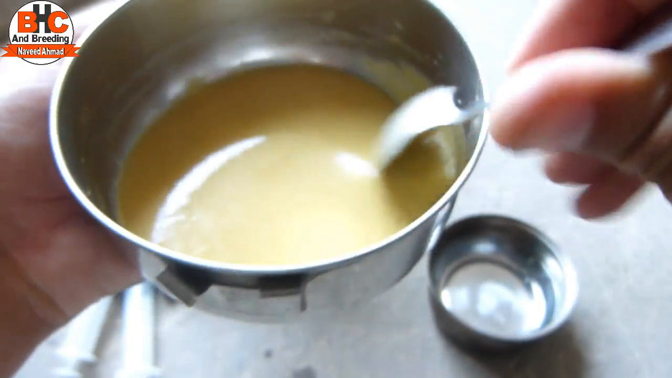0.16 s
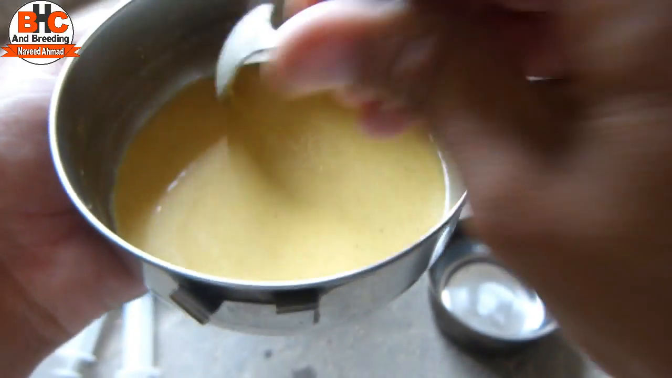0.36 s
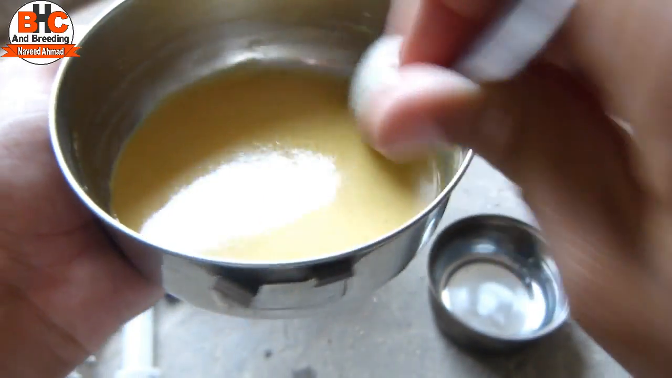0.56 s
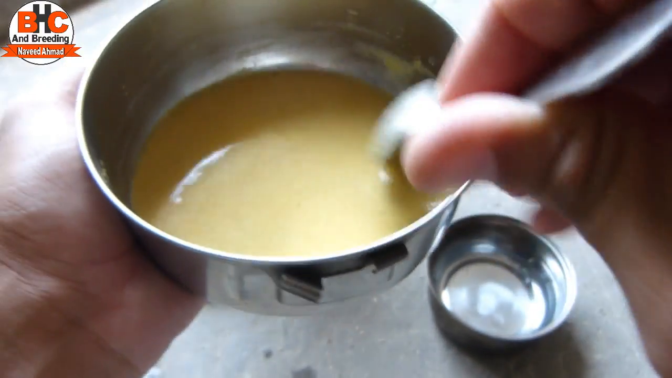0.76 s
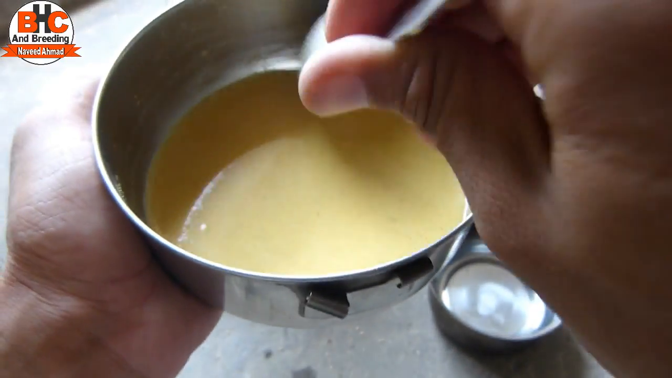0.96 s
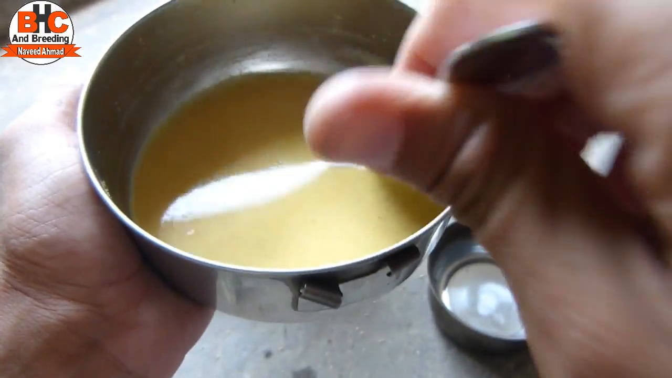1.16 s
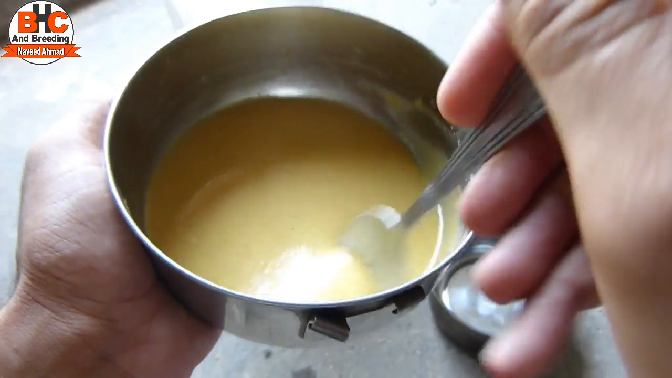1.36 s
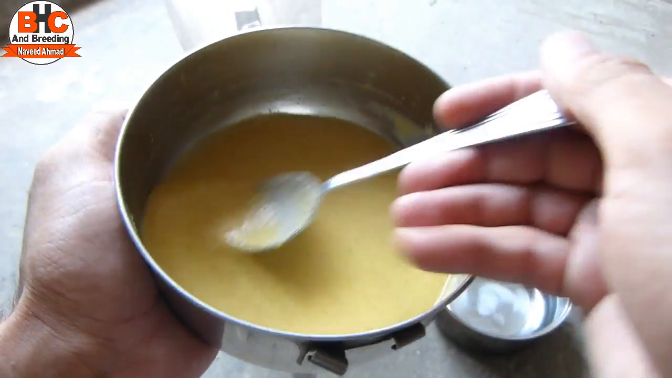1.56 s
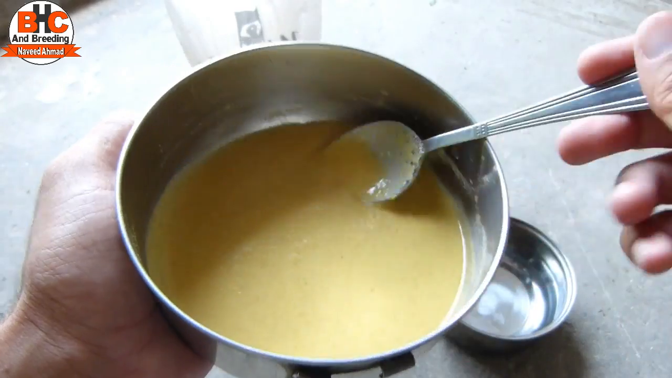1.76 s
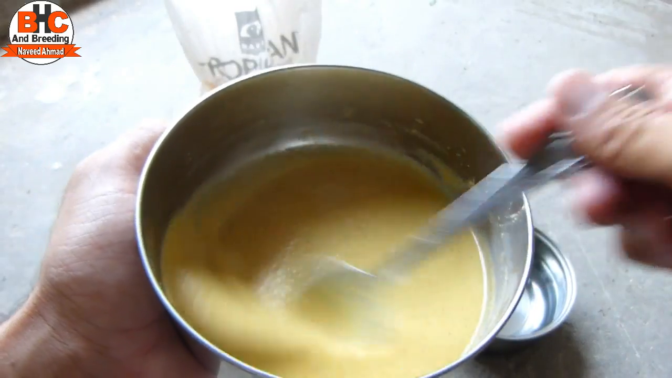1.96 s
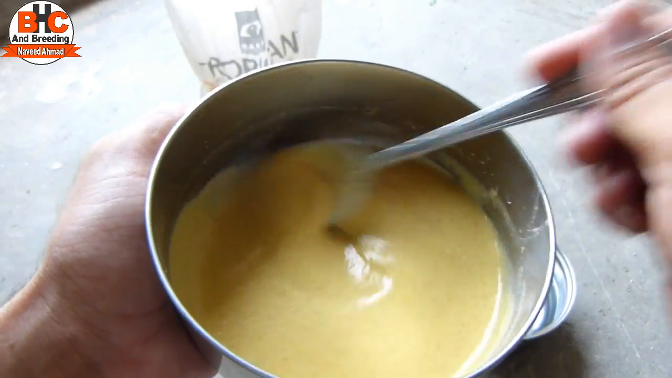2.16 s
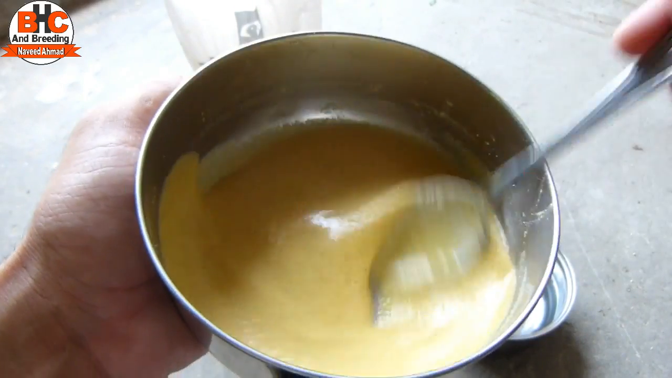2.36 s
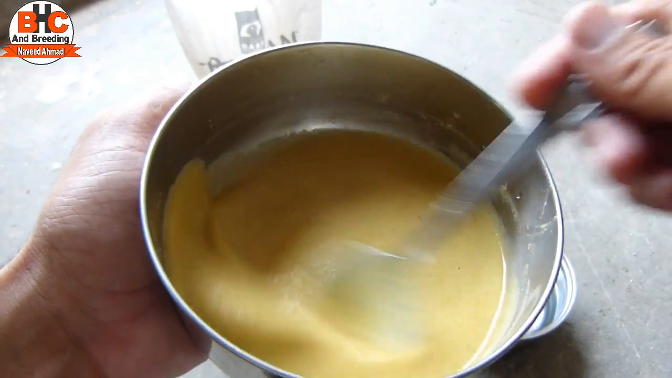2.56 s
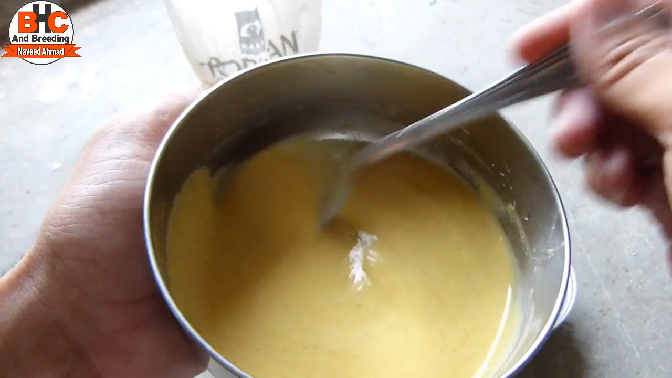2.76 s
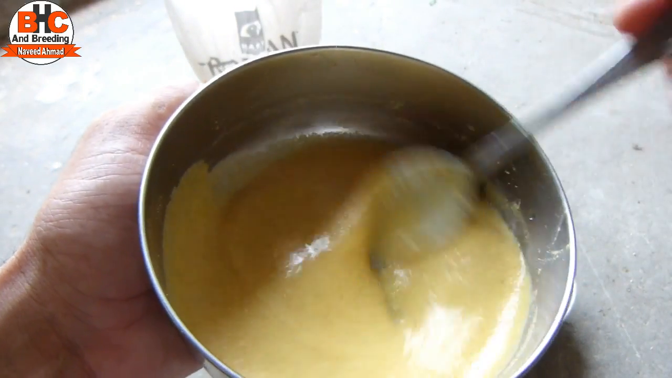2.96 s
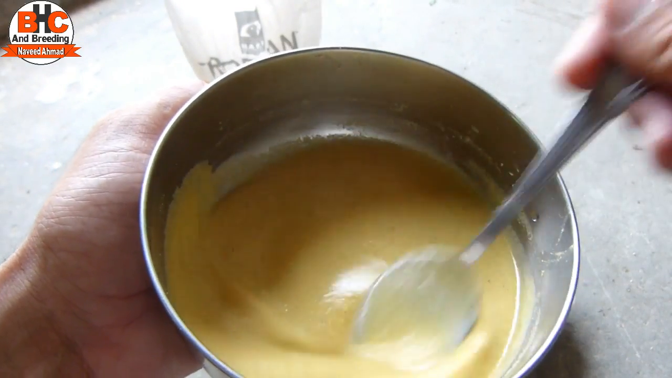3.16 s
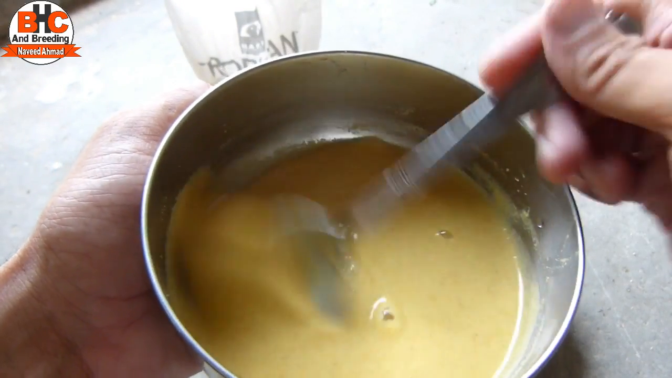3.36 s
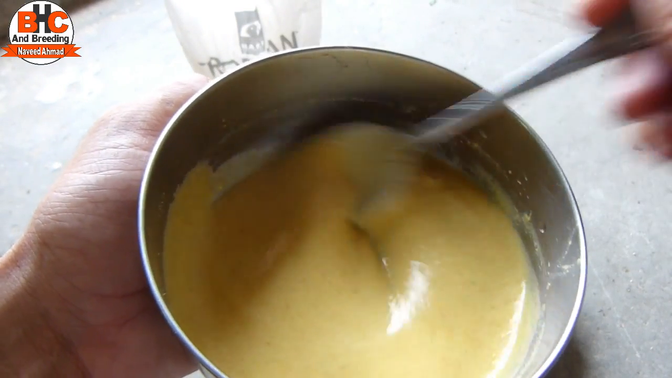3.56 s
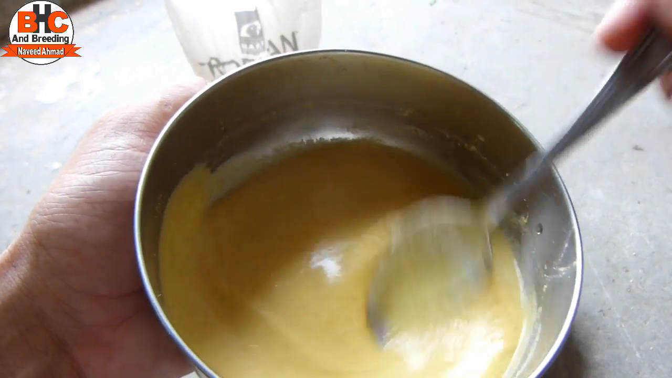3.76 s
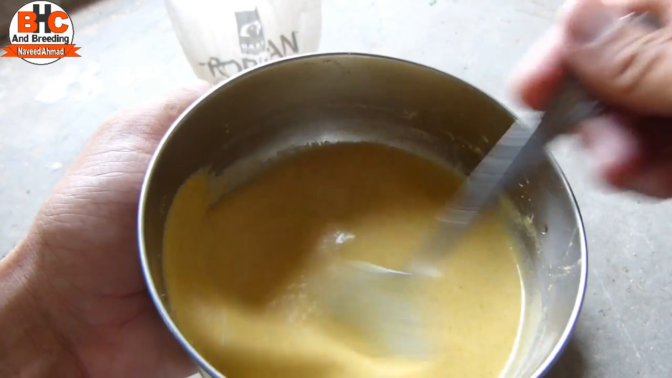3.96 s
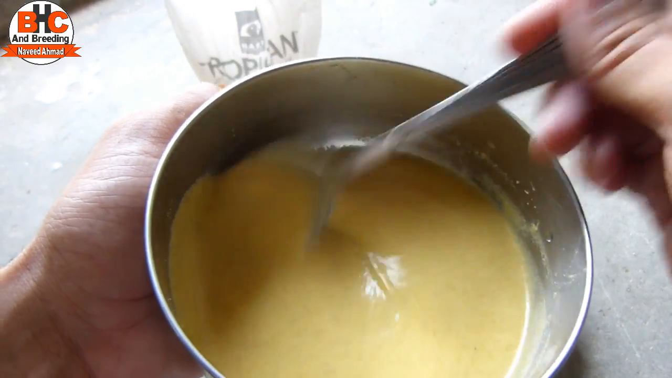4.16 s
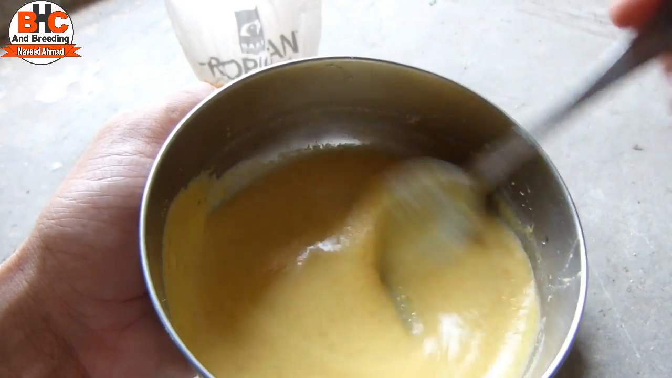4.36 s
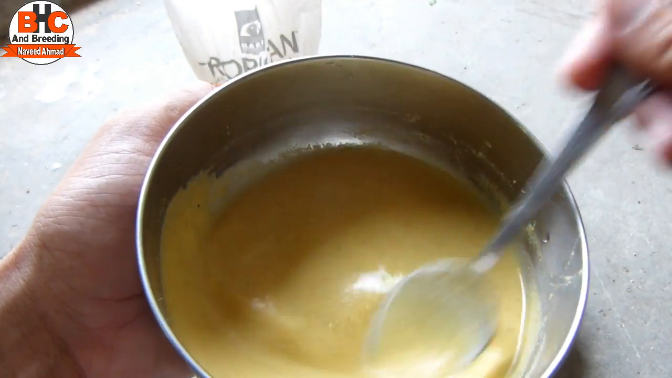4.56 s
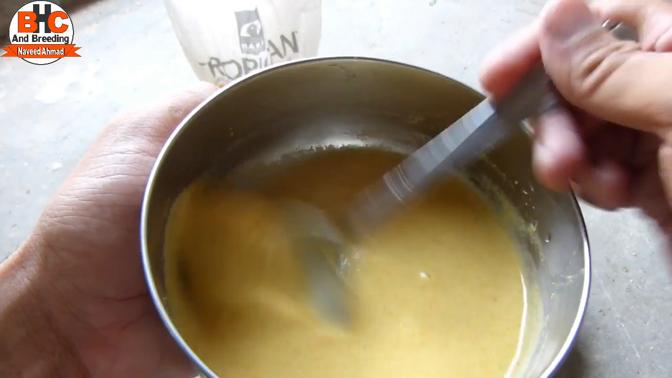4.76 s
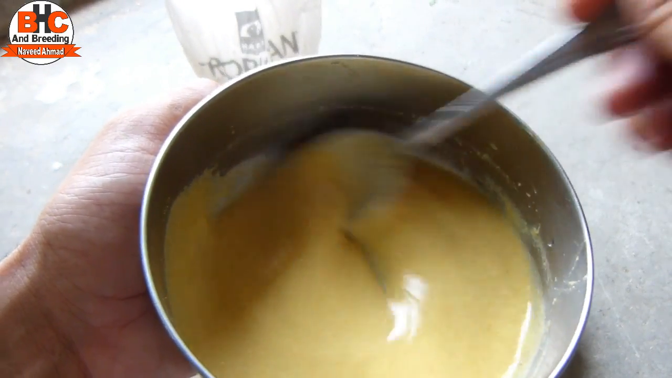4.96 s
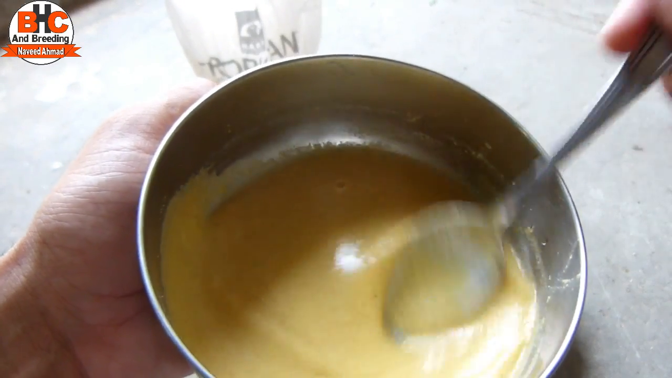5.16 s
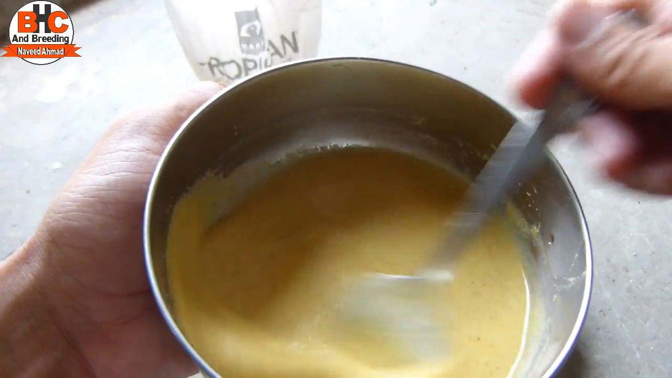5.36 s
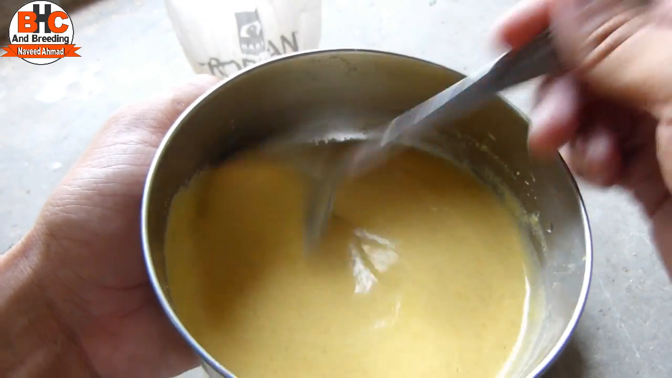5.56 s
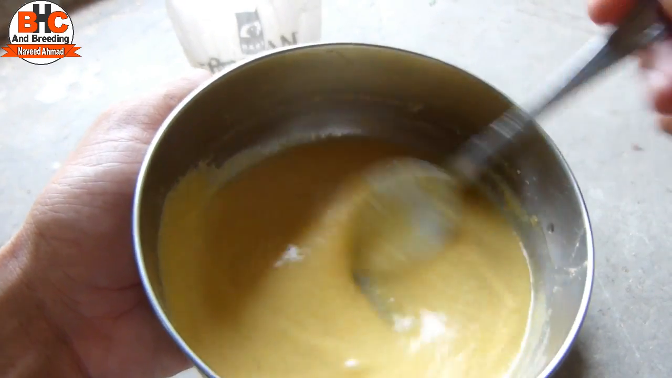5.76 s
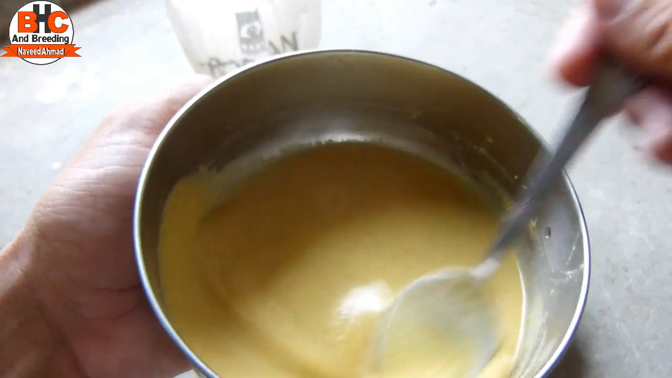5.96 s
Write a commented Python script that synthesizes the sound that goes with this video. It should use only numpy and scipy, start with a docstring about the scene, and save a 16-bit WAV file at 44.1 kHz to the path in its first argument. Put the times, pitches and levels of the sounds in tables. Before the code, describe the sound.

Very close in a small hard indoor room, a spoon edge rasps against a steel bowl. Thin, hesitant scrapes and isolated clanks come first, then louder quick strokes in a steady stirring rhythm, peppered with short metallic knocks. Thick batter and the gripping hand damp the metal, so each ring dies quickly. Low sloshing follows the strokes, a few bubbles pop late, and faint house noise stays underneath.

```python
"""A steel spoon scrapes round a hand-held steel bowl of thick batter, close to a small stereo microphone.
Its edge rasps over the wall in dense random catches that ring the bowl's modes; now and then it knocks,
a noise crack plus decaying modes. Hand and batter damp the bowl, so it rings only briefly.
Shaped noise makes the sloshing batter, the sliding hand and the faint house; gliding tones are bursting
air pockets. A small hard room answers with a decaying noise tail."""
import sys
import numpy as np
from scipy import signal
from scipy.fft import rfft, irfft, next_fast_len
from scipy.io import wavfile
from scipy.ndimage import uniform_filter1d

SR = 44100
rng = np.random.default_rng(int(sys.argv[2]) if len(sys.argv) > 2 else 0)


def persist_wave(psi):
    """Save psi, clipped to +-1, as 16-bit WAV."""
    counts = np.round(np.clip(psi, -1, 1) * 32767).astype(np.int16)
    wavfile.write(sys.argv[1], SR, np.atleast_2d(counts).T)


def boost(x):
    """Linear amplitude factor 10**(x/20) for a level x in decibels (scalar or array-like)."""
    u = np.asarray(x, float) / 20
    return 10 ** u


N = 265526

# knocks of the spoon: (time [s], level [dB], lower modes and thud, relative [dB], favoured lower pitch [Hz])
KNOCKS = [(0.1122, -13, 2.5, 1930), (0.4261, -5.5, 1.5, 1196), (0.9555, 2.5, -13, 1770),
          (1.153, -12, -30, 1500), (1.744, 1, -19.5, 705), (1.8026, -2, -6.5, 660), (2.0425, 0, -17.5, 825),
          (2.1129, -4, -12, 931), (2.2697, -6, -9, 1650), (2.283, -11.5, -4, 1020), (2.387, -15, -18, 1480),
          (2.409, -9, -29, 880), (2.5654, -2, -14, 1620), (2.697, -5, -20, 1650), (2.9393, -1.5, -16, 920),
          (2.9738, 0.5, -11, 930), (3.1202, -2.5, -8.5, 880), (3.3945, -3.5, -7, 1020),
          (3.5117, -2, -8.5, 930), (3.5406, -4, -10, 940), (3.6075, -2.5, -8, 950), (3.6772, -8.5, -6, 980),
          (3.886, -2, -26, 1540), (3.9555, -17, 4.5, 1590), (4.0891, -9.5, -14.5, 850),
          (4.1015, -4, -20, 950), (4.166, -6, -4, 1620), (4.2222, -7.5, -9, 950), (4.2379, -16, -4, 966),
          (4.37, -3.5, -18, 920), (4.4623, -6, -19, 964), (4.5179, -6.5, -7, 1000), (4.632, -6, -2.5, 900),
          (4.6632, -5, -6, 890), (4.782, -14, 4.5, 1690), (4.795, -0.5, -15, 964), (4.9331, 2.5, -17, 900),
          (5.1763, 0.5, -11, 910), (5.2148, -1.5, -6, 907), (5.3521, -11, 1, 1630), (5.4953, -4, -10, 940),
          (5.6167, -6.5, -3, 1490), (5.6311, -5, -3.5, 1680), (5.742, -20, -29, 900),
          (5.7761, -4.5, -19, 883), (5.825, -21.5, 8, 710)]
# deep modes of the bowl: (frequency [Hz], relative level [dB])
DEEP_MODES = [(710, 19), (840, -4), (920, 23), (990, 21.5)]
# middle modes of the bowl: (frequency [Hz], relative level [dB])
MIDDLE_MODES = [(1420, -23), (1560, 26.5), (1640, 29), (1850, 15.5), (2105, 29), (2260, 27), (2480, 20),
                (2700, 26), (3000, 33), (3240, 36)]
# bright modes of the bowl: (frequency [Hz], relative level [dB])
BRIGHT_MODES = [(3720, 0), (4050, 23), (4200, 17.5), (4700, -18), (5050, 19.5), (5420, -23), (5580, 18.5),
                (7150, -32), (7750, 1), (8200, 23), (8600, -23), (9400, -20), (11000, 32)]

LEFT_RIGHT = np.array([[1], [-1]])  # sign of the side signal in each ear


def unit(x):
    """Scale to rms 1."""
    return x / np.sqrt(np.mean(x ** 2))


def colour(x, table):
    """Filter by (frequency [Hz], gain [dB]) points, interpolated over log frequency."""
    n = next_fast_len(x.shape[-1])
    hz, db = np.transpose(table)
    bin_hz = np.arange(n // 2 + 1) * SR / n
    gain = boost(np.interp(np.log(bin_hz + 1), np.log(hz), db))
    return irfft(rfft(x, n) * gain, n)[..., :x.shape[-1]]


def walk(rate_hz):
    """Random levels held 1 / rate_hz s and smoothed twice; spread near 1."""
    k = max(int(SR / rate_hz), 2)
    held = np.repeat(rng.standard_normal(N // k + 1), k)
    return 1.4 * uniform_filter1d(uniform_filter1d(held, k), k)[:N]


def curves(table):
    """Columns of a (time [s], value, ..) table at every sample."""
    s, *columns = np.transpose(table)
    return [np.interp(np.arange(N) / SR, s, c) for c in columns]


def tail(t60_s, seconds, wide):
    """Decaying noise for both ears, scaled to unit energy; wide weighs the part that differs between them."""
    t = np.arange(int(seconds * SR)) / SR
    mid, side = rng.standard_normal((2, len(t)))
    both = np.exp(-np.log(1000) * t / t60_s) * (mid + wide * side * LEFT_RIGHT)
    return both / np.sqrt(np.sum(both ** 2) / 2)


def decay_step(hz, t60_s):
    """Complex factor that advances a decaying tone by one sample."""
    return np.exp(2j * np.pi * hz / SR - np.log(1000) / (t60_s * SR))


def pole(hz, damp=1):
    """One sample step of a bowl mode; the higher, the shorter it rings."""
    t60_1khz_s, slope = 0.095, 0.6
    return decay_step(hz, damp * t60_1khz_s * (1000 / hz) ** slope)


def ears(hz):
    """A mode reaches left and right a little out of step, at random, the more the higher it lies."""
    spread_3khz_rad = 0.35
    shift_rad = spread_3khz_rad * np.sqrt(hz / 3000) * rng.standard_normal()
    return np.exp(1j * shift_rad * LEFT_RIGHT)


def nearness(hz, centre_hz, reach):
    """Gain of a mode by how near it lies to the pitch that the contact favours; reach in log frequency."""
    return boost(-10 * np.minimum((np.log(hz / centre_hz) / reach) ** 2, 2))


def strokes(step=44):
    """Level [dB], age [s], deep level [dB], bright pitch [Hz] of the strokes; power weighs those that overlap."""
    bite_db_s, swell_db_s, lift_db_s = 522, 16.5, 305  # slopes before, during and after a stroke
    # spoon along the wall:
    # (start [s], length [s], mid-stroke level [dB], deep modes relative [dB], bright pitch [Hz])
    stroke_table = [(0, 0.031, -30, -38.5, 6100), (0.07, 0.0058, -37, -11.5, 5800),
                    (0.107, 0.09, -42.5, -0.5, 5500), (0.219, 0.24, -33.5, -16.5, 4860),
                    (0.439, 0.066, -34.5, -15, 5960), (0.609, 0.079, -30.5, -27, 7340),
                    (0.825, 0.12, -42, -30, 3670), (0.96, 0.2, -31, -23.5, 8160),
                    (1.209, 0.065, -28.5, -13, 6600), (1.37, 0.12, -25, -20, 6100),
                    (1.816, 0.13, -26, -20.5, 6370), (2.087, 0.042, -25, -13.5, 5640),
                    (2.189, 0.07, -21, -12.5, 5830), (2.416, 0.012, -23.5, -13.5, 6800),
                    (2.48, 0.053, -20.5, -13, 6570), (2.602, 0.1, -21.5, -20.5, 6570),
                    (2.768, 0.11, -21, -31.5, 6440), (2.89, 0.097, -23, -15, 6940),
                    (3.051, 0.062, -20.5, -14.5, 6400), (3.161, 0.1, -19, -16.5, 7400),
                    (3.329, 0.037, -17, -18.5, 4900), (3.399, 0.063, -25.5, -17, 7100),
                    (3.542, 0.016, -22.5, -9.5, 5400), (3.617, 0.085, -20, -14.5, 5030),
                    (3.792, 0.045, -17, -22, 6500), (3.892, 0.054, -20, -13, 5400),
                    (3.987, 0.085, -21.5, -27.5, 6570), (4.095, 0.002, -19, -8.5, 6400),
                    (4.158, 0.081, -18.5, -19, 5070), (4.381, 0.0027, -19.5, -12.5, 6700),
                    (4.44, 0.086, -19, -20, 5100), (4.634, 0.087, -24.5, -11, 5740),
                    (4.764, 0.065, -20.5, -22, 5160), (4.879, 0.056, -22.5, -22, 6570),
                    (4.996, 0.083, -19.5, -15, 5940), (5.177, 0.069, -26.5, -10.5, 6500),
                    (5.289, 0.045, -17, -11, 5900), (5.379, 0.12, -20, -25.5, 6820),
                    (5.551, 0.081, -17, -17, 5400), (5.668, 0.024, -31, -21, 5640),
                    (5.784, 0.14, -19, -12, 5570)]
    t = np.arange(0, N + step, step) / SR
    start, seconds, db, deep_db, hz = np.transpose(stroke_table)[:, :, None]
    end = start + seconds
    age_s = np.clip(t, start, end) - start
    db = db + swell_db_s * (age_s - seconds / 2)
    db = db - bite_db_s * np.maximum(start - t, 0) - lift_db_s * np.maximum(t - end, 0)
    power = boost(db) ** 2
    total = power.sum(axis=0)
    means = [(power * column).sum(axis=0) / total for column in (age_s, deep_db, hz)]
    return curves(np.transpose([t, 10 * np.log10(total), *means]))


def catches(share=0.25, scatter_db=3.0, bounce_db=5.0, judder_db=2.0):
    """The edge catches and slips at random, in a share of all samples; small bounces bring sudden flurries."""
    bounce_rate_hz, bounce_decay_s = 60, 0.004
    chance = rng.random((5, N))
    sizes = boost(-scatter_db * np.log(chance[1] + 1e-4)) * np.sign(chance[2] - 0.5)
    bounces = (chance[3] < bounce_rate_hz / SR) * boost(bounce_db) * chance[4] ** 2
    flurry = 1 + signal.lfilter([1], [1, -np.exp(-1 / (bounce_decay_s * SR))], bounces)
    judder = boost(judder_db * walk(90))
    return unit((chance[0] < share) * sizes * flurry * judder)


def rubbed(modes, force, centre_hz, reach, bend=0, roam_db=4.0, drift=0.022):
    """The moving contact feeds each mode now more, now less; sloshing batter detunes it (share of pitch)."""
    out, power = 0, 0
    for hz, db in modes:
        mode_hz = hz * (1 + bend + drift * walk(10))
        turn = np.exp(2j * np.pi * np.cumsum(mode_hz) / SR)
        fade = abs(pole(hz))
        gain = boost(db + roam_db * walk(30)) * nearness(hz, centre_hz, reach)
        # a one-pole decay in the mode's own turning frame is a resonator of moving pitch
        ring = turn * signal.lfilter([1], [1, -fade], force * gain / turn)
        out = out + np.sqrt(1 - fade ** 2) * (ring * ears(hz)).imag
        power = power + gain ** 2 / 2
    return out / np.sqrt(uniform_filter1d(power, size=2000))  # the modes share one supply of energy


def crowd(force):
    """Wall modes too close to tell apart: patches of differing tint, fed more or less as the spoon travels."""
    t60_s, patch_count, roam_db, hump_db = 0.02, 9, 5.0, 9
    # colour common to all patches: (frequency [Hz], gain [dB])
    crowd_table = [(1500, -77), (2300, -5.5), (3500, -19), (4050, -6), (6000, -5), (7900, -2),
                   (11400, -8.5), (14500, -23.5), (16500, -128)]
    out, power = 0, 0
    for hz in np.geomspace(3300, 12500, patch_count):
        patch = colour(tail(t60_s, 0.06, wide=0.19 * np.sqrt(hz / 6000)), crowd_table)
        patch = patch / np.sqrt(np.sum(patch ** 2) / 2)
        patch = colour(patch, [(hz / 1.154, 0), (hz, hump_db), (hz * 1.17, 0)])
        share = boost(roam_db * walk(25))
        out = out + signal.oaconvolve(force[None] * share, patch, axes=1)[:, :N]
        power = power + share ** 2
    return out / np.sqrt(power)


def rasp():
    """Spoon edge dragged along the wall: catches drive bright modes and crowd, rarer jolts the lower modes."""
    # at first the spoon works the dry wall above the batter:
    # (time [s], lift of the middle modes [dB], their favoured pitch [Hz])
    dry_wall = [(0, 31, 1850), (.15, 4, 1920), (.3, 0.5, 2200), (.5, -3.5, 2000), (.61, 24, 2320),
                (.66, 24.5, 2060), (.72, 5.5, 2360), (.95, 18, 2560), (1.05, 12.5, 2100), (1.3, -2.5, 2000),
                (6.02, -0.5, 2000)]
    press_db, age_s, deep_db, bright_hz = strokes()
    dry_db, middle_hz = curves(dry_wall)
    force = catches() * boost(press_db)
    jolts = catches(share=0.004, scatter_db=1.5, bounce_db=0.0, judder_db=3.0) * boost(press_db)

    wall = crowd(force)
    top = signal.sosfilt(signal.butter(2, 6800, "high", fs=SR, output="sos"), wall)
    wall = wall + top * (bright_hz / 6000 - 1)  # a high contact pitch brightens the crowd too
    bright = boost(-5.0) * rubbed(BRIGHT_MODES, force, bright_hz, reach=0.4) + boost(-4.5) * wall

    # middle level follows the deep level in part and drops 7.5 dB per octave of bright pitch
    middle_db = -5 + 0.58 * deep_db - 7.5 * np.log2(bright_hz / 6000) + dry_db
    middle_reach = np.clip(0.45 - 0.013 * dry_db, 0.15, 1)
    middle = rubbed(MIDDLE_MODES, (force + jolts) * boost(middle_db), middle_hz, middle_reach)

    push = (0.18 * force + jolts) * boost(deep_db)
    bend = 0.04 - 0.9 * age_s  # deep pitch falls through each stroke
    deep = rubbed(DEEP_MODES, push, 940, reach=0.3, bend=bend, roam_db=4.5, drift=0.015)
    return bright + middle + deep


def batter():
    """Dull sloshing: low noise that swells with the stroke."""
    slosh_db, follow, wide = -44, 0.5, 0.76
    table = [(40, -14), (110, -5), (220, 0.0), (450, 1.5), (800, -41)]
    mid, side = colour(rng.standard_normal((2, N)), table)
    swell_db = follow * strokes()[0] + 3 * walk(30)
    return boost(slosh_db + swell_db) * (mid + wide * side * LEFT_RIGHT) / np.std(mid)


def house():
    """Faint steady hum and hiss of shaped noise, partly different left and right."""
    level_db, wide = -54.5, 0.68
    # colour of the house noise: (frequency [Hz], gain [dB])
    house_table = [(20, 24), (60, 8.5), (160, 20), (300, 14.5), (500, 17.5), (900, 16), (2200, 14),
                   (3200, 0), (5000, 6), (9000, -2), (16000, -29)]
    mid, side = colour(rng.standard_normal((2, N)), house_table)
    return boost(level_db) * (mid + wide * side * LEFT_RIGHT) / np.std(mid)


def room(bowl):
    """A small hard room answers the bowl with a decaying noise tail."""
    level_db, t60_s = -17.5, 0.31
    walls = colour(tail(t60_s, 0.5, wide=0.89), [(200, 13.5), (16000, 5)])
    echo = signal.fftconvolve(bowl.mean(axis=0)[None], walls, axes=1)[:, :N]
    return boost(level_db) * echo


def grip():
    """The holding hand slides on the outside of the bowl, skin on steel: a soft low rub."""
    # the slide: (start [s], length [s], level [dB])
    slide = (0.03, 0.56, -47)
    start_s, length_s, level_db = slide
    progress = np.clip((np.arange(N) / SR - start_s) / length_s, 0, 1)
    shape = np.sin(np.pi * progress) ** 0.5
    table = [(150, -20.5), (300, -14), (460, -2.5), (650, -10), (1100, -31)]
    return boost(level_db) * shape * unit(colour(rng.standard_normal(N), table))


def struck(modes, steps, centre_hz, reach, sag_per_s=0):
    """One blow: modes start at random strengths, those near the blow's pitch favoured; peak 1."""
    damp = 0.83  # the spoon on the wall shortens the ring to this share
    hz, db = np.transpose(modes)
    gain = boost(db + 4 * rng.standard_normal(len(hz))) * nearness(hz, centre_hz, reach)
    bend = np.exp(-1j * np.pi * sag_per_s * hz[:, None] * (steps / SR) ** 2)
    rings = gain[:, None] * pole(hz, damp)[:, None] ** steps * bend
    out = sum((ring * ears(f)).imag for f, ring in zip(hz, rings))
    return out / np.abs(out).max()


def knocks():
    """Each knock: a short noise crack around the pitch the contact favours, with the bowl's modes."""
    rise_s, crack_t60_s, ring_db = 0.0008, 0.021, -7.5
    sag_per_s = 2.2  # batter piles against the wall and pulls the lower modes down, share of pitch per s
    out, steps = np.zeros((2, N + SR)), np.arange(SR // 8)
    rise = np.minimum((steps + 1) / (rise_s * SR), 1)
    bright_hz = strokes()[-1]
    for s, db, body_db, body_hz in KNOCKS:
        i = int(s * SR)
        hz = bright_hz[i]
        table = [(500, body_db - 8.5), (hz / 2.0, body_db / 2 - 6.5), (hz / 1.04, -6), (hz, 0),
                 (hz * 1.51, -4), (17000, -26)]
        crack = colour(tail(crack_t60_s, 1 / 8, wide=0.13), table)[:, :len(steps)]
        crack = crack / np.abs(crack).max()
        ring = boost(ring_db) * struck(BRIGHT_MODES, steps, hz, reach=0.22)
        body = boost(body_db) * struck(DEEP_MODES + MIDDLE_MODES, steps, body_hz, 0.25, sag_per_s)
        out[:, i:i + len(steps)] += boost(db) * (crack + ring + body) * rise
    return out[:, :N]


def thuds():
    """Each knock also jolts bowl and hand: a dull low bump, one decaying tone."""
    thud_db, hz, t60_s = -26.5, 210, 0.017
    s, db, body_db, _ = np.transpose(KNOCKS)
    jolts = np.zeros(N)
    jolts[(s * SR).astype(int)] = boost(db + body_db + thud_db)
    return signal.lfilter([1], [1, -decay_step(hz, t60_s)], jolts).imag


def bubbles():
    """Air pockets burst in the batter: short tones that glide up."""
    # bursts: (time [s], level [dB], start pitch [Hz], end pitch [Hz], length [s])
    bursts = [(2.852, -22, 1230, 1340, 0.0064), (4.66, -17, 1140, 1370, 0.0085),
              (5.082, -24.5, 1086, 1210, 0.029), (5.54, -13.5, 946, 1630, 0.02),
              (5.683, -28, 1320, 1550, 0.01)]
    out = np.zeros(N)
    for s, db, hz, end_hz, length_s in bursts:
        t = np.arange(int(length_s * SR)) / (length_s * SR)  # 0 to 1 through the burst
        tone = np.sin(2 * np.pi * np.cumsum(hz * (end_hz / hz) ** t ** 2) / SR)
        i = int(s * SR)
        out[i:i + len(t)] += boost(db) * np.minimum(t / 0.15, 1) * (1 - t) * tone
    return out


def scene():
    """Bowl close by, its echo from the walls, batter, hand and the house behind."""
    # a small bowl cannot push air at low pitches
    small = signal.butter(6, 630, "high", fs=SR, output="sos")
    bowl = signal.sosfilt(small, rasp() + knocks() + bubbles())
    near = (bowl + thuds()) * boost([[0.2], [-0.2]])  # a touch to the left
    return near + room(bowl) + batter() + grip() + house()


def roll_off(x):
    """The treble ends steeply here."""
    return signal.sosfilt(signal.butter(12, 16840, fs=SR, output="sos"), x)


def record(dry):
    """A small steady offset, a hard ceiling, a steep cut of the top."""
    offset, ceiling = -0.0031, 0.92
    clipped = np.clip(dry + offset, -ceiling, ceiling)
    top_cut = signal.ellip(6, 0.2, 60, 15000, fs=SR, output="sos")
    mix = signal.sosfilt(top_cut, clipped)
    return roll_off(mix)


dry = scene()
out = record(dry)
persist_wave(out)
```